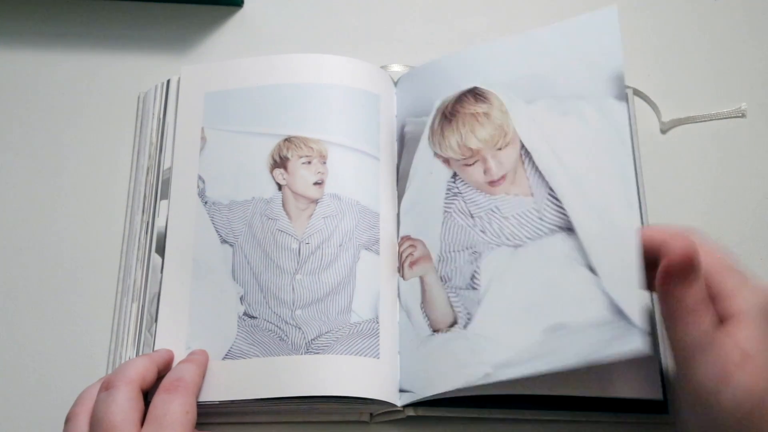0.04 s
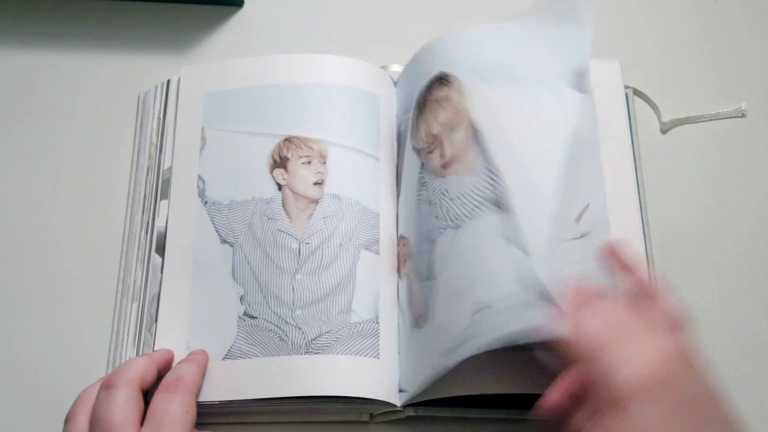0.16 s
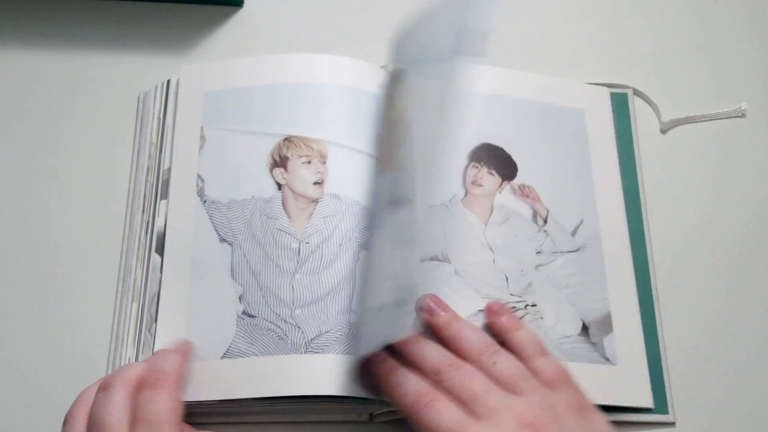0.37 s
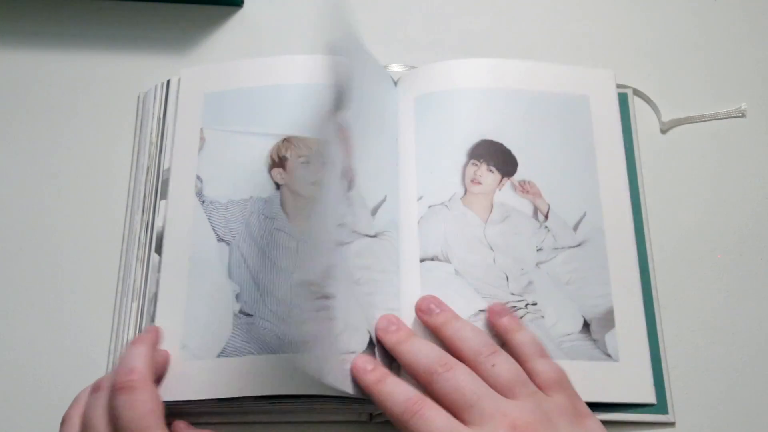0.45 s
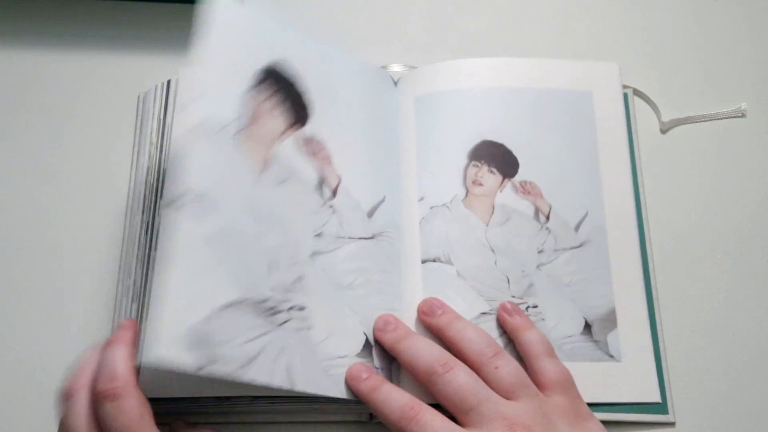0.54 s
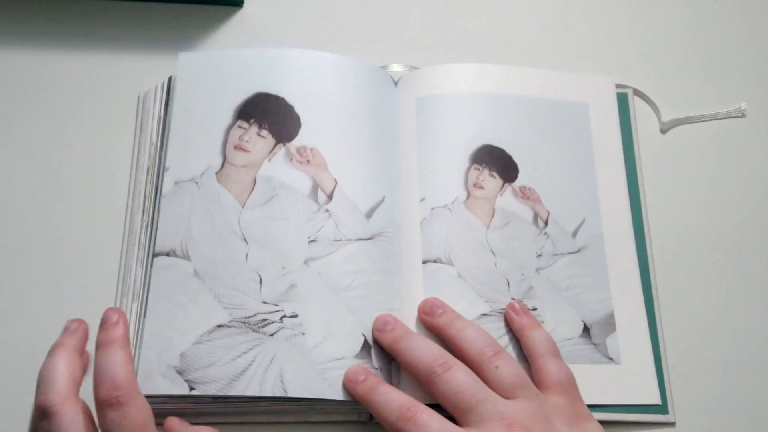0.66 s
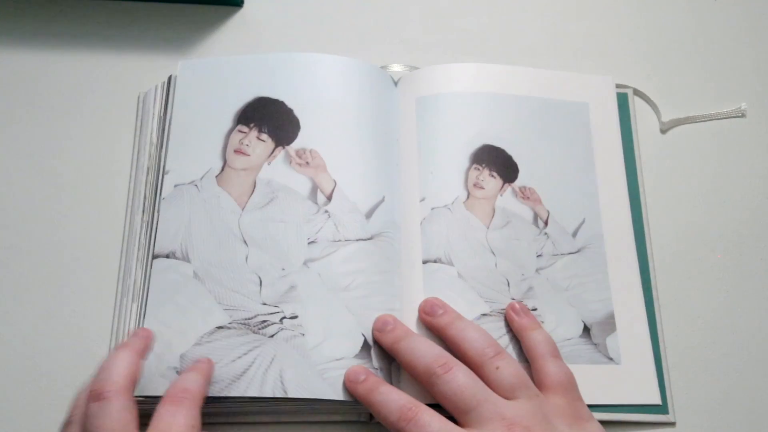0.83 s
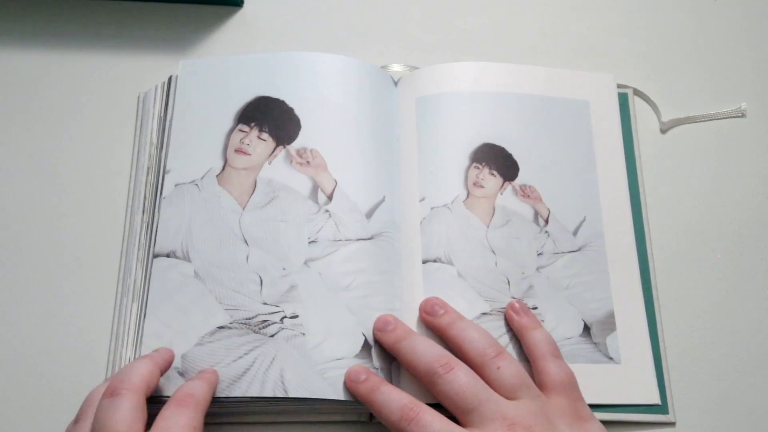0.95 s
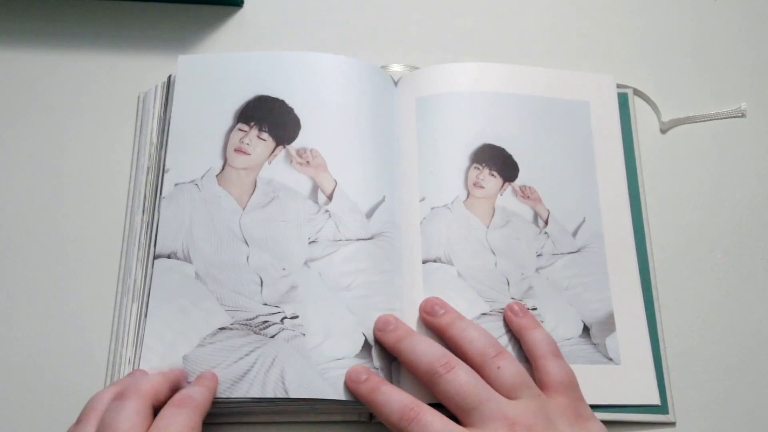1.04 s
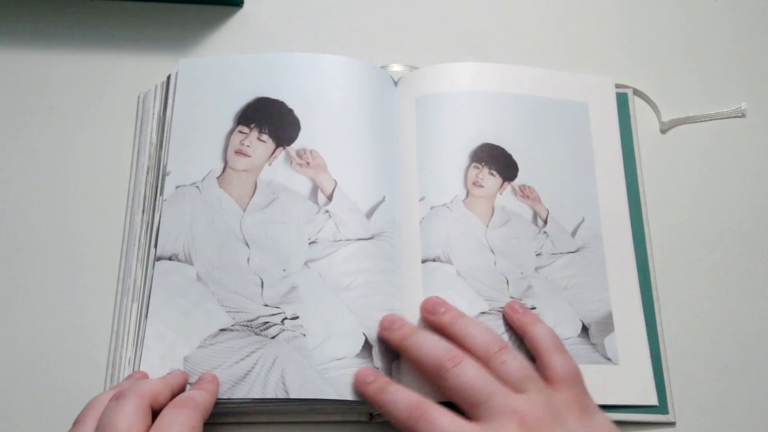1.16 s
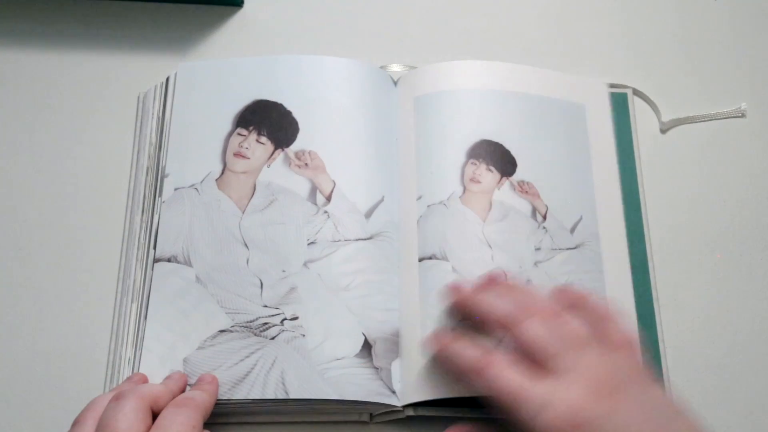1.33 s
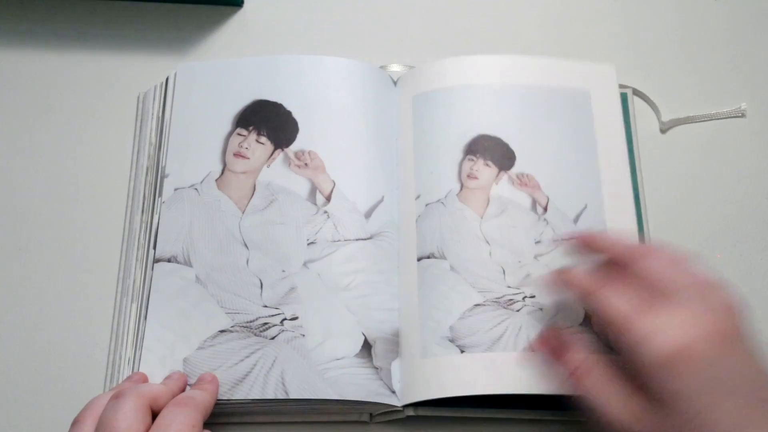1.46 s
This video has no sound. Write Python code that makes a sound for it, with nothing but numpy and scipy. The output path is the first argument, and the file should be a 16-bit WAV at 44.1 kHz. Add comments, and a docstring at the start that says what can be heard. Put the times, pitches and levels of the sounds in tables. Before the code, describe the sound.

A stiff glossy page of a hardcover book is turned, close to the microphone: a fading rustle, a sudden loud snap with dense crackle, a softer flap as it settles, then tiny finger ticks in a quiet room.

```python
"""First a bright crackle and hiss: a hand turns one stiff glossy page of a hardcover book, heard close up.
The sheet buckles in dense dull crackles (short random rings) and loud pops (single swelling rings), slides
over fingers and pages with a thin hiss (high rings) and rubs (narrow noise), then settles. A finger ticks
on the gloss (small rings), the page edge clicks (band-limited impulses), sparse echoes answer, and the
quiet room lies behind as patchy noise with a fuzzy band."""
import sys
import numpy as np
from scipy import signal
from scipy.io import wavfile
from scipy.ndimage import uniform_filter1d

SR = 44100
rng = np.random.default_rng(int(sys.argv[2]) if len(sys.argv) > 2 else 0)


def ratio_of_db(decibels):
    """Turn decibels (scalar or array-like) into linear amplitude factors; 0 dB maps to 1."""
    return 10 ** (np.asarray(decibels, float) / 20)


def to_wav(sig):
    """Store sig (one row per channel, or 1-D mono) as 16-bit WAV at the path in sys.argv[1].

    Samples outside -1..1 are clipped; the rate is SR.
    """
    pcm = np.clip(np.atleast_2d(sig), -1, 1) * 32767
    pcm = np.round(pcm).astype(np.int16)
    wavfile.write(sys.argv[1], SR, pcm.T)  # frames by channels


N = 66150  # samples, 1.5 s

# bending sheet, one list per passage: t/s, level/dB, crackle centre/octaves above 1 kHz, spread/octaves
BUCKLING = [
    [(0, -36, 1.56, 1.94), (.03, -43.5, 1.46, 1.47), (.07, -59, 1.7, 1.76), (.12, -58, 1.2, 1.9),
     (.16, -64, 1.1, 1.8), (.21, -58.5, 2.3, 0.79)],
    [(.221, -68, 0.24, 1.1), (.227, -29.5, 0.051, 0.94), (.243, -31, 0.61, 0.95), (.255, -23.5, 0.97, 1.23),
     (.268, -27, .9, 1.1), (.273, -30, .7, .9), (.279, -28, 1.3, .9), (.286, -21, 1.2, .85),
     (.3, -25.5, 0.99, 0.95), (.34, -26.5, 0.8, 1.17), (.4, -32, 0.76, 0.98), (.465, -39, 0.43, 1.14),
     (.51, -50.5, 0.72, 1.2), (.555, -61.5, 1.04, 1.15), (.6, -65, 0.91, 0.61)],
    [(.694, -68.5, -0.12, 0.73), (.701, -39, 0.34, 0.8), (.715, -41.5, 0.25, 1.22),
     (.734, -43.5, 0.0066, 0.73), (.75, -44, -.1, 0.52), (.765, -45.5, -0.13, 0.41),
     (.786, -49, 0.037, 0.7), (.802, -56, 0.31, 0.67), (.86, -79, -0.068, 0.77)],
]
# gloss on skin and paper, one list per passage: t/s, lower band level/dB, upper band level/dB
SLIDING = [
    [(0.0, -44.5, -43.5), (0.048, -48, -49.5), (0.054, -48, -51), (0.098, -50.5, -58.5), (0.13, -68, -70.5),
     (0.148, -60.5, -65), (0.208, -69, -60.5), (0.216, -56.5, -55), (0.244, -37.5, -48),
     (0.262, -39.5, -79), (0.268, -50, -50.5), (0.278, -37.5, -65), (0.286, -53, -100), (0.29, -68.5, -91),
     (0.308, -66, -97), (0.314, -73, -109), (0.334, -66, -60.5), (0.426, -64, -68), (0.47, -58, -54.5),
     (0.502, -56, -62.5), (0.56, -73, -77.5), (0.588, -70, -74), (0.616, -61, -69), (0.628, -72.5, -75),
     (0.64, -56.5, -54.5), (0.672, -64.5, -68), (0.704, -70, -58), (0.758, -83, -100),
     (0.778, -73.5, -103.5), (0.8, -84.5, -98)],
    [(1.03, -78.5, -99.5), (1.11, -79, -84), (1.17, -79.5, -87.5), (1.228, -89, -90.5), (1.24, -76, -70.5),
     (1.27, -72, -67.5), (1.33, -79, -77), (1.37, -85.5, -73), (1.428, -71.5, -63), (1.5, -75, -81)],
]
# colour of the sliding hiss, lower and upper band: f/Hz, relative density/dB per Hz
SLIDE_LOW_COLOUR = [(2240, -36), (3800, 1), (4400, -2), (4830, 0), (5240, 0), (5560, -0.5), (6560, -3),
                    (6810, -12), (7200, -8.5), (9360, -31), (15800, -120)]
SLIDE_HIGH_COLOUR = [(4120, -31.5), (7000, -3), (8430, -1), (9350, 0), (10900, -5.5), (12800, -12.5),
                     (13500, -16.5), (15100, -29.5), (15500, -38.5)]
# squeaky rubs and soft brushes: peak t/s, half length/s, level/dB, f/Hz, width/Hz
RUB_SWELLS = [(0.038, 0.059, -45, 2260, 730), (0.067, 0.038, -48, 5630, 496), (0.157, 0.06, -60, 1280, 200),
              (0.163, 0.024, -61, 9050, 600), (0.173, 0.033, -61.5, 11320, 1490),
              (0.198, 0.013, -52.5, 8800, 500), (0.231, 0.0092, -42.5, 5430, 398.4),
              (0.241, 0.016, -45, 9780, 802), (0.343, 0.021, -50.5, 300, 158),
              (0.493, 0.025, -55.5, 5030, 400), (0.594, 0.018, -63.5, 8320, 502),
              (0.664, 0.021, -58.5, 4350, 450), (0.696, .012, -62, 5540, 300),
              (0.765, 0.016, -56.5, 2170, 503), (1.435, 0.02, -73, 5230, 500),
              (0.992, .015, -69, 2090, 500), (1.124, 0.0092, -65.5, 3350, 1813),
              (1.295, .02, -68, 3330, 496), (1.465, 0.027, -64.5, 3300, 700),
              (1.241, 0.025, -68.5, 331, 201), (1.313, 0.028, -62, 877, 247), (1.477, 0.023, -67, 481, 200)]
# colour of the room's hiss: f/Hz, relative density/dB per Hz
ROOM_COLOUR = [(40, -68), (150, -42), (241, -19), (461, -14), (523, -10), (840, -10.5), (1160, -9),
               (1780, -12), (1960, -8.5), (2710, -13.5), (3400, -12), (5590, -34), (7180, -31), (7930, -32),
               (15600, -34)]
# drift of the room tone: t/s, hiss level/dB, fuzzy band level/dB
ROOM_DRIFT = [(.84, -66, -64.5), (.92, -63.5, -65), (.98, -64, -70.5), (1.02, -64, -64),
              (1.075, -63.5, -67), (1.12, -65.5, -60.5), (1.2, -63.5, -72.5), (1.27, -62.5, -73.5),
              (1.31, -64, -65), (1.39, -62.5, -62), (1.5, -60.5, -78.5)]
# dry ticks on the gloss: peak t/s, peak level/dB, f/Hz, t60/s
GLOSS_TICKS = [(0.2191, -32, 5700, 0.01), (0.4735, -42, 5100, 0.021), (.6395, -48, 4300, .015),
               (0.6455, -41, 4270, 0.012), (0.6505, -46, 4250, .012), (0.645, -50, 2810, 0.033),
               (1.118, -59, 6735, 0.032), (1.235, -38, 9470, 0.0088), (1.2375, -41.5, 7240, 0.0068),
               (1.2415, -51, 9700, 0.0088), (1.246, -53, 9130, 0.015)]
# sheet popping through a bend: peak t/s, peak level/dB, f/Hz, rise/s, t60/s, glide/octaves over the rise
SHEET_POPS = [(0.2282, -22.5, 1312, 0.0033, 0.027, 0.093), (.229, -27, 550, 0.0026, 0.03, 0.),
              (.2515, -22, 805, 0.0034, 0.05, 0), (.256, -19, 1847, 0.0016, .015, 0.013),
              (0.2628, -9.5, 2223, 0.00059, 0.0032, 0.03), (0.267, -15, 1460, .001, 0.0075, 0.0074),
              (.27545, -5.5, 1700, .0007, .016, 0.), (.2771, -3.5, 2300, .0005, .009, .12),
              (.2785, -13, 3100, .0008, .012, .15), (.280, -13, 1850, .0012, .01, 0.),
              (.283, -15, 2200, .001, .015, 0.), (0.3184, -27, 1720, 0.00098, 0.0066, 0.04),
              (0.3775, -21, 1390, 0.0015, 0.0025, 0.2), (.7037, -21, 1400, .0018, .016, .1),
              (.705, -28, 700, .003, .016, 0.), (.7105, -24.5, 1250, .0012, .014, 0.),
              (0.7244, -31, 1170, 0.002, 0.014, 0.033), (.763, -35.5, 804, 0.0021, 0.017, 0),
              (.768, -33, 785, 0.00094, 0.0079, 0.098), (.781, -39.5, 803, .002, 0.037, 0.),
              (.787, -35, 808, 0.0027, .012, 0.)]
# bare clicks of the page edge: peak t/s, peak level/dB, low edge f/Hz, high edge f/Hz
EDGE_CLICKS = [(.2751, -33, 3500, 13000), (.2771, -28, 3500, 14000), (.2628, -44, 11000, 15000),
               (.3341, -46, 6500, 11000), (.4663, -35, 8500, 15000), (.474, -33, 3000, 7500),
               (.487, -34, 4500, 9000), (.6388, -44, 3500, 12000), (1.2356, -36, 6500, 10500)]

# grains: cycles in a ring, rings per second over all pitches, unevenness of their strength in dB
FLEX_CYCLES, FLEX_PER_S, FLEX_UNEVEN_DB = 9, 8000, 2.8
SLIDE_CYCLES, SLIDE_PER_S, SLIDE_UNEVEN_DB = 45, 14000, 2
FLEX_TOP_SHARE = 0.55  # spread above the crackle's centre, as a share of that below
FUZZ_HZ, FUZZ_WIDTH_HZ, PATCHY_DB = 1240, 68, 3.5
TICK_RISE_S = 0.0008
ECHO_DB, ECHO_T60_S, ECHO_TOP_HZ = -18, 0.25, 5000
PULSE_S, PULSE_DB, PULSE_LEN_S = 0.276, -46, 0.004
PAGE_LOW_HZ = 254  # the page sounds are cut below this


def evened(x):
    """Scales to rms 1."""
    return x / np.sqrt(np.mean(x ** 2) + 1e-20)


def read(points, hz):
    """Reads a spectrum table on a log-frequency axis."""
    f, value = np.transpose(points)
    return np.interp(np.log(hz + 1), np.log(f + 1), value)


def curve(rows):
    """A gate that fades over 20 ms outside a curve table, and the table's columns at every sample."""
    t, rows = np.arange(N) / SR, np.array(rows)
    inside = np.minimum(t - rows[0, 0], rows[-1, 0] - t)
    gate = np.clip(1 + inside / 0.02, 0, 1)
    return gate, [np.interp(t, rows[:, 0], column) for column in rows.T[1:]]


def add(mix, s, sound):
    """Mixes a sound in at time s."""
    part = mix[round(s * SR):][:len(sound)]
    part += sound[:len(part)]


def grains(pitches_hz, weights, cycles, per_s, uneven_db):
    """Random short rings at many pitches; weights (pitch x time) set the colour; expected rms 1."""
    out = np.zeros(N)
    weights = weights / np.sqrt((weights ** 2).sum(0))
    chance = per_s / len(pitches_hz) / SR
    for hz, weight in zip(pitches_hz, weights):
        u = np.arange(int(cycles * SR / hz)) / SR * hz / cycles  # 0 to 1 through the ring
        ring = np.sin(np.pi * u) ** 2 * np.exp(-2 * u) * np.sin(2 * np.pi * cycles * u)
        lead = len(ring)  # a run-in, so rings already sound at the start
        hit, size, sign = rng.random((3, N + lead))
        strength = ratio_of_db(-uneven_db * np.log(np.maximum(size, 0.02)))
        train = (hit < chance) * strength * np.sign(sign - 0.5)
        weight = np.pad(weight * np.ones(N), (lead, 0), "edge")
        rings = signal.oaconvolve(weight * evened(train), ring / np.linalg.norm(ring))
        out += rings[lead:][:N]
    return out


def burst(db, hz, rise, t60, glide=0.0):
    """A ring that swells to its peak and dies away, its pitch gliding through the peak."""
    t = np.arange(-3 * rise, t60, 1 / SR)
    shape = np.where(t < 0, np.exp(-(t / rise) ** 2), ratio_of_db(-60 * t / t60))
    turns = np.cumsum(hz * 2 ** (glide * np.tanh(t / rise))) / SR
    return ratio_of_db(db) * shape * np.cos(2 * np.pi * (turns - turns[np.argmax(shape)]))


def flex():
    """The bending sheet buckles in a crackle whose pitches cluster round a moving centre."""
    hz = np.geomspace(150, 6500, num=30)
    level, weights = np.zeros(N), np.full((30, N), 1e-6)
    for rows in BUCKLING:
        gate, (db, centre, spread) = curve(rows)
        level += gate * ratio_of_db(db)
        away = (np.log2(hz[:, None] / 1000) - centre) / np.maximum(spread, 0.2)
        away = np.where(away > 0, away / FLEX_TOP_SHARE, away)
        weights += gate * np.exp(-0.5 * away ** 2)
    return level * grains(hz, weights, FLEX_CYCLES, FLEX_PER_S, FLEX_UNEVEN_DB)


def slide():
    """Fine stick-slip squeaks of the gloss blend into hiss in a lower and an upper band."""
    out = np.zeros(N)
    for band, colour in enumerate((SLIDE_LOW_COLOUR, SLIDE_HIGH_COLOUR)):
        hz = np.geomspace(colour[0][0], colour[-1][0], num=36)
        # root of f turns density per Hz into weight per log-spaced pitch
        weights = (ratio_of_db(read(colour, hz)) * np.sqrt(hz))[:, None]
        level = np.zeros(N)
        for rows in SLIDING:
            gate, levels_db = curve(rows)
            level += gate * ratio_of_db(levels_db[band])
        out += level * grains(hz, weights, SLIDE_CYCLES, SLIDE_PER_S, SLIDE_UNEVEN_DB)
    return out


def rubs():
    """Squeaky rubs and soft brushes as short swells of narrow noise."""
    out = np.zeros(N + SR)  # half a second spare at each end
    for s, half, db, hz, width_hz in RUB_SWELLS:
        t = np.arange(-2 * half, 2 * half, 1 / SR)
        edges = [hz - width_hz / 2, hz + width_hz / 2]
        band = signal.butter(2, edges, "band", fs=SR, output="sos")
        noise = evened(signal.sosfilt(band, rng.standard_normal(SR // 2)))[-len(t):]
        add(out, s - 2 * half + 0.5, ratio_of_db(db) * np.exp(-(t / half) ** 2) * noise)
    return out[SR // 2:][:N]


def room_tone():
    """Noise shaped into patchy low hiss, plus noise through one resonance as a fuzzy band."""
    frames, hz = N // 128 + 6, np.fft.rfftfreq(512, 1 / SR)
    real, imag, patches = rng.standard_normal((frames, 257, 3)).T
    patches = uniform_filter1d(patches, size=4, axis=0)  # over frequency
    patches = evened(uniform_filter1d(patches, size=16, axis=1))  # over time
    colour = ratio_of_db(read(ROOM_COLOUR, hz)[:, None] + PATCHY_DB * patches)
    hiss = signal.istft((real + 1j * imag) * colour, nperseg=512, noverlap=384)[1]
    hiss = evened(hiss[:N])
    r = np.exp(-np.pi * FUZZ_WIDTH_HZ / SR)
    resonance = [1, -2 * r * np.cos(2 * np.pi * FUZZ_HZ / SR), r * r]
    fuzz = evened(signal.lfilter([1], resonance, rng.standard_normal(N)))
    hiss_db, fuzz_db = curve(ROOM_DRIFT)[1]
    return ratio_of_db(hiss_db) * hiss + ratio_of_db(fuzz_db) * fuzz


def ticks():
    """A finger ticks on the gloss in small, high, quickly damped rings."""
    out = np.zeros(N)
    for s, db, hz, t60 in GLOSS_TICKS:
        add(out, s - 3 * TICK_RISE_S, burst(db, hz, TICK_RISE_S, t60))
    return out


def pops():
    """The sheet pops through a bend in single damped rings, some gliding up."""
    out = np.zeros(N)
    for s, db, hz, rise, t60, glide in SHEET_POPS:
        add(out, s - 3 * rise, burst(db, hz, rise, t60, glide))
    return out


def echo(x):
    """Sparse random reflections from table and walls, duller than the direct sound."""
    taps = np.zeros(SR // 2)
    at = np.arange(200, SR // 2 - 20, 20)
    at = at + rng.integers(0, 20, len(at))
    taps[at] = rng.choice([-1.0, 1.0], len(at)) * ratio_of_db(-60 * at / SR / ECHO_T60_S)
    taps = signal.lfilter(*signal.butter(1, ECHO_TOP_HZ, fs=SR), taps)
    return ratio_of_db(ECHO_DB) * signal.fftconvolve(x, taps / np.linalg.norm(taps))[:N]


def clicks():
    """Bare clicks of the page edge as band-limited impulses."""
    out = np.zeros(N)
    for s, db, low_hz, high_hz in EDGE_CLICKS:
        click = signal.firwin(45, [low_hz, high_hz], pass_zero=False, fs=SR)
        add(out, s - 22 / SR, ratio_of_db(db) * click / click.max())  # peaks at its middle sample
    return out


def low_pulse():
    """A faint, smooth low pulse under the biggest pop."""
    out = np.zeros(N)
    pulse = np.hanning(int(PULSE_LEN_S * SR))
    add(out, PULSE_S - PULSE_LEN_S / 2, ratio_of_db(PULSE_DB) * pulse)
    return out


def scene():
    """Page, fingers and the echo of the snaps, thin in the bass; the room tone and one faint low pulse."""
    snaps = ticks() + pops() + clicks()
    page = flex() + slide() + rubs() + snaps + echo(snaps)
    bass_cut = signal.butter(4, PAGE_LOW_HZ, "high", fs=SR, output="sos")
    mix = signal.sosfilt(bass_cut, page) + room_tone() + low_pulse()
    return mix[None]


def low_pass(x):
    """Removes everything above the highest recorded frequency."""
    return signal.sosfilt(signal.butter(12, 15710, fs=SR, output="sos"), x)


def record(dry):
    """Delivers the finished mix."""
    return low_pass(dry)


dry = scene()
out = record(dry)
to_wav(out)
```